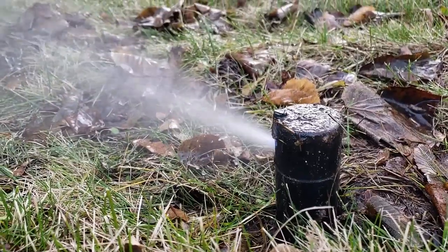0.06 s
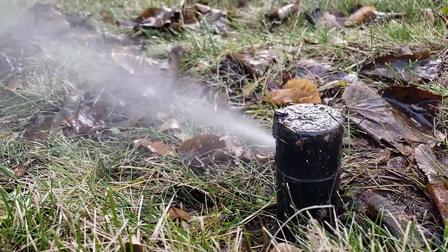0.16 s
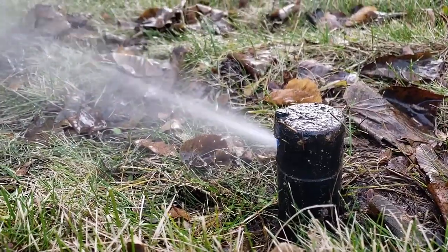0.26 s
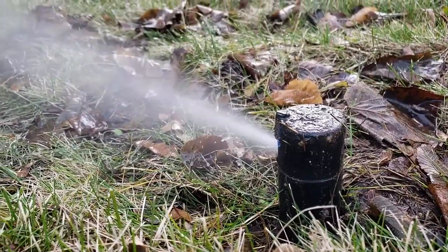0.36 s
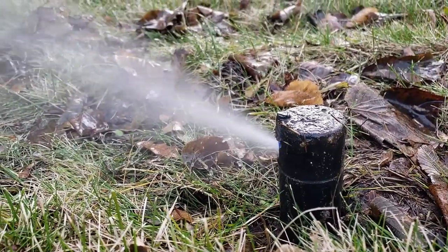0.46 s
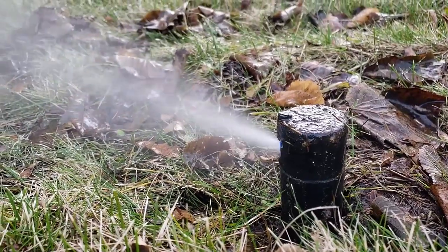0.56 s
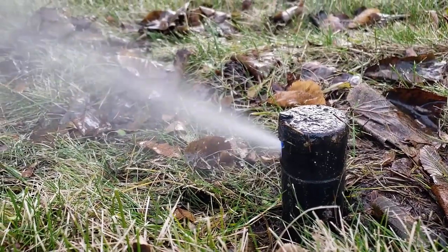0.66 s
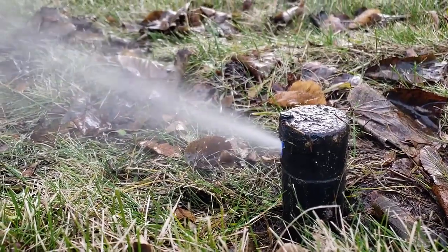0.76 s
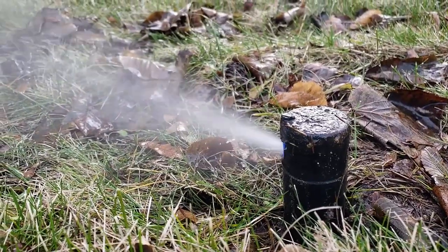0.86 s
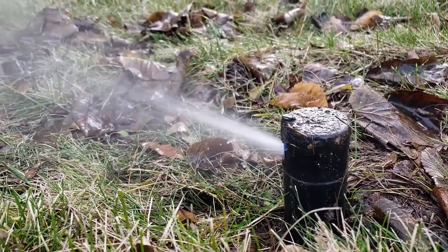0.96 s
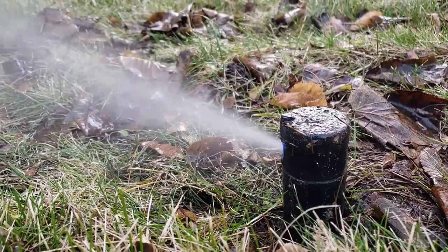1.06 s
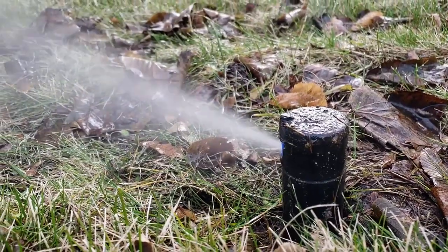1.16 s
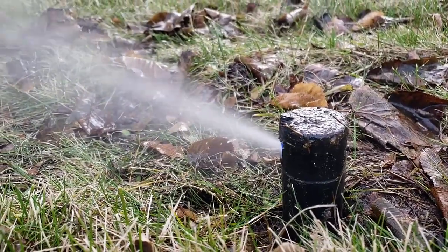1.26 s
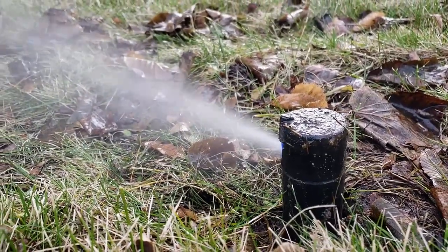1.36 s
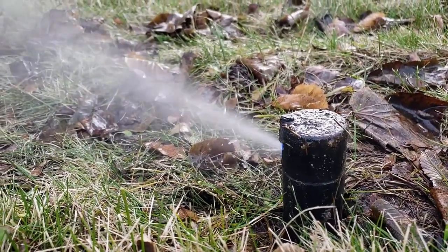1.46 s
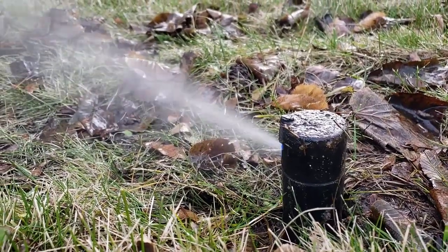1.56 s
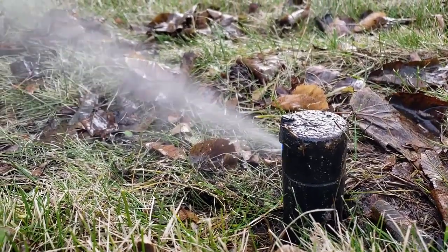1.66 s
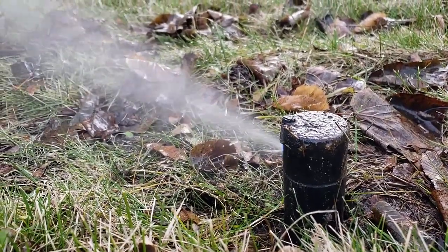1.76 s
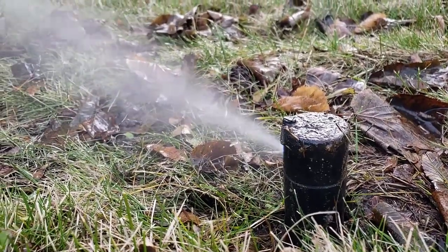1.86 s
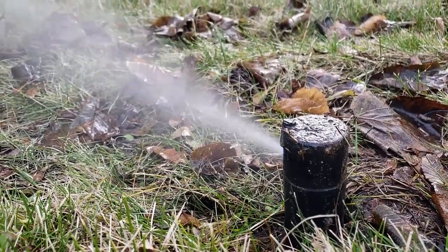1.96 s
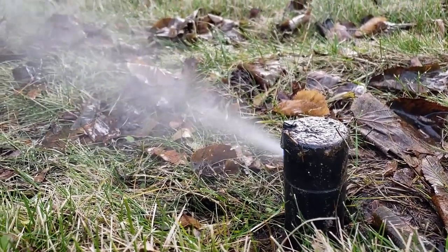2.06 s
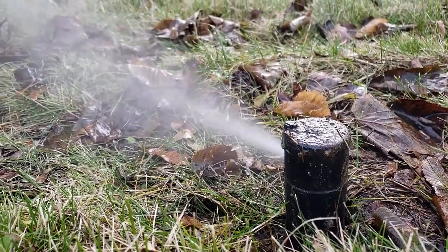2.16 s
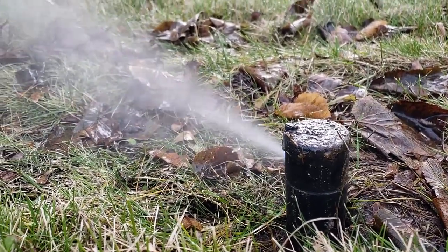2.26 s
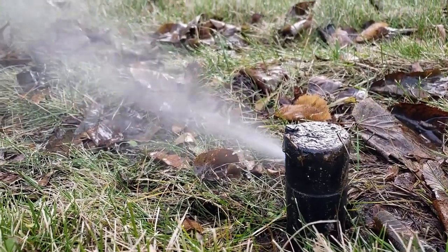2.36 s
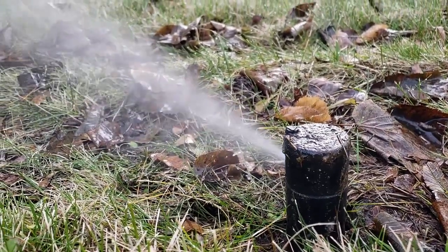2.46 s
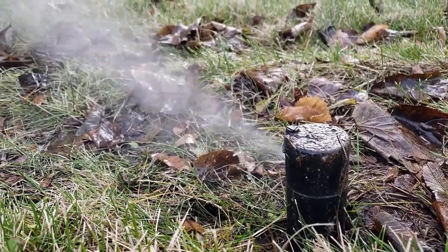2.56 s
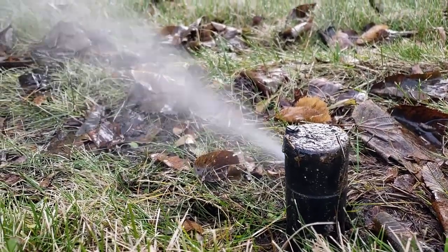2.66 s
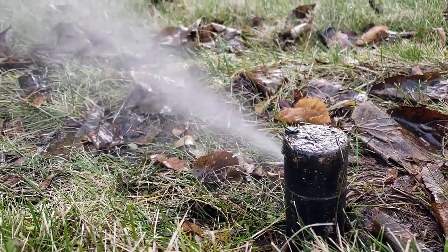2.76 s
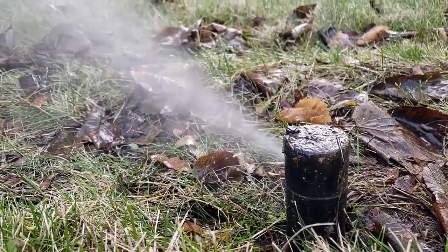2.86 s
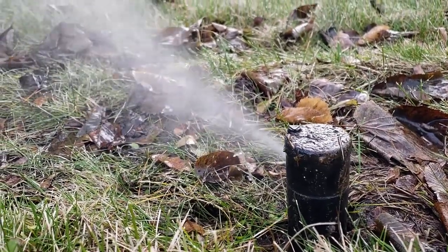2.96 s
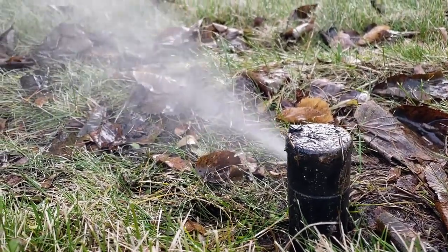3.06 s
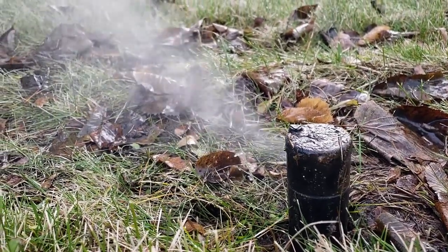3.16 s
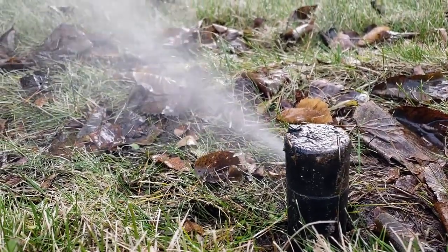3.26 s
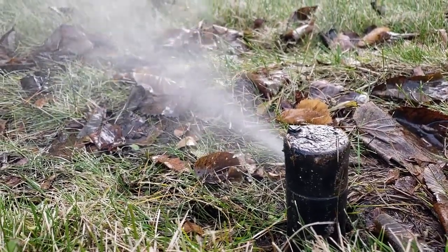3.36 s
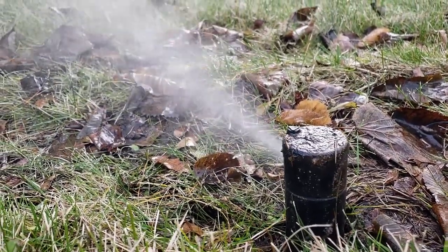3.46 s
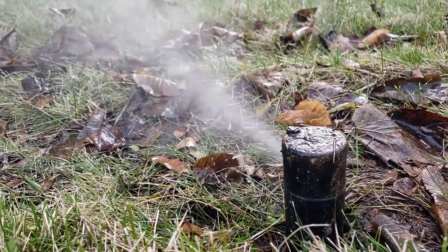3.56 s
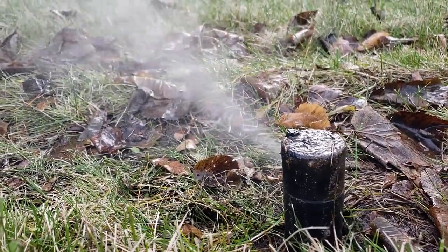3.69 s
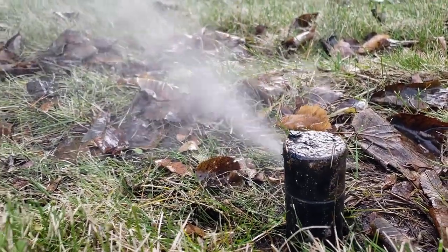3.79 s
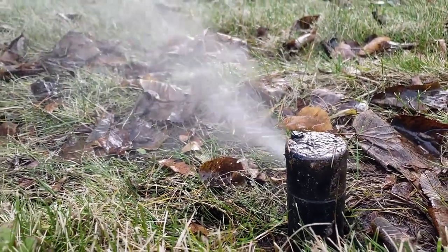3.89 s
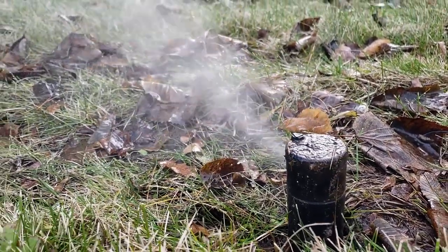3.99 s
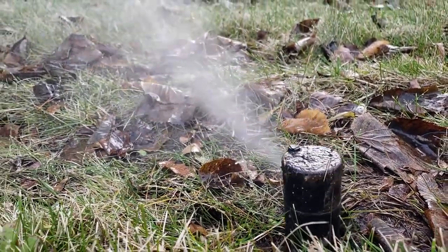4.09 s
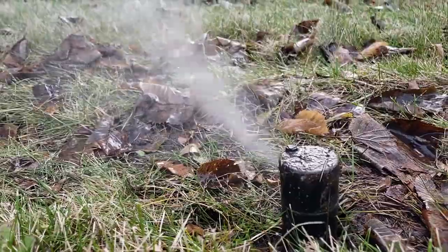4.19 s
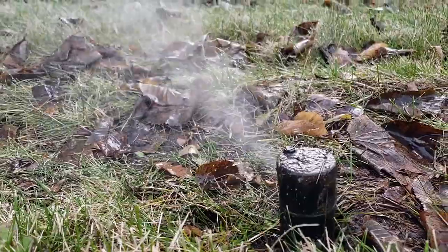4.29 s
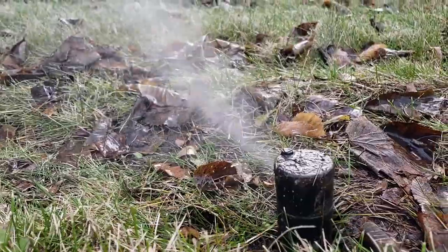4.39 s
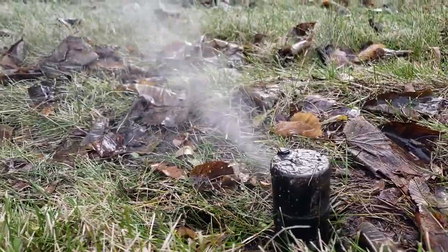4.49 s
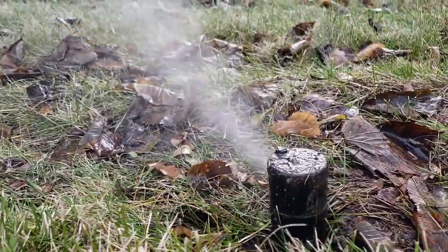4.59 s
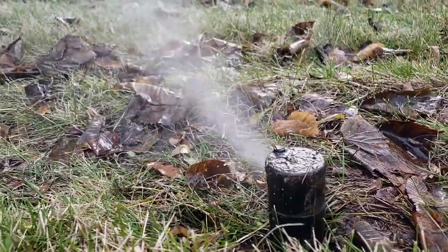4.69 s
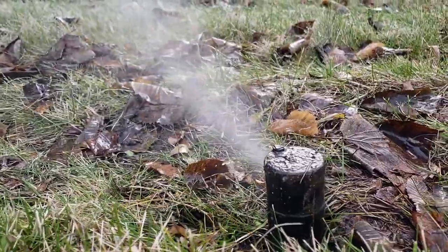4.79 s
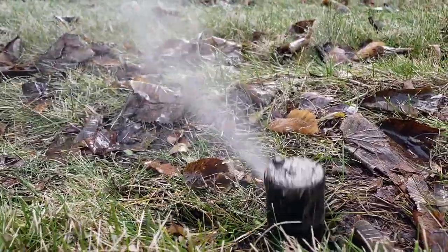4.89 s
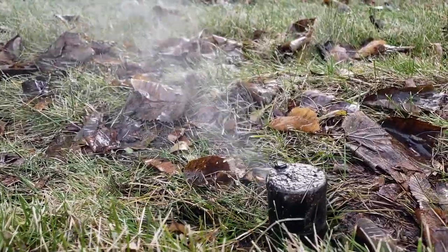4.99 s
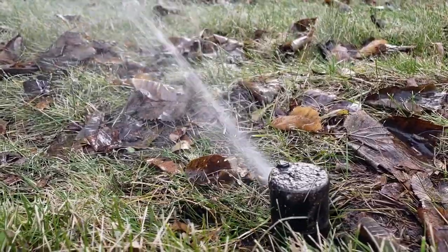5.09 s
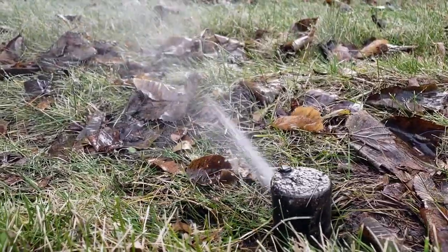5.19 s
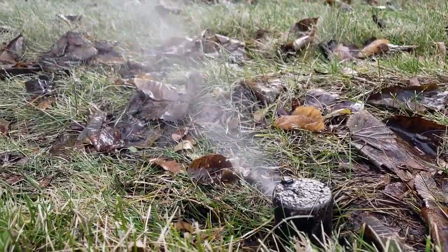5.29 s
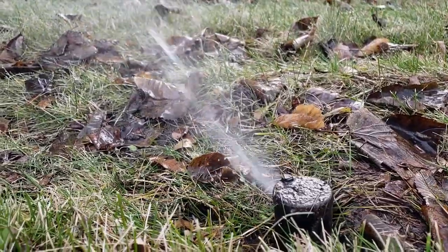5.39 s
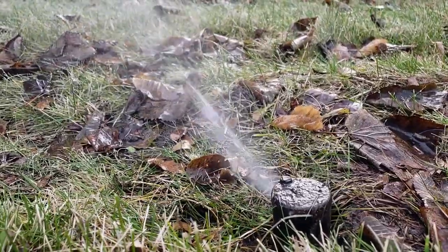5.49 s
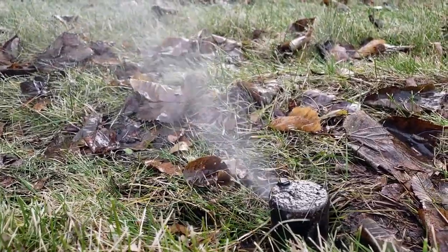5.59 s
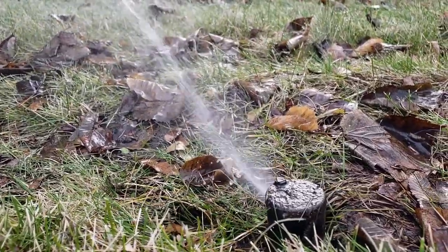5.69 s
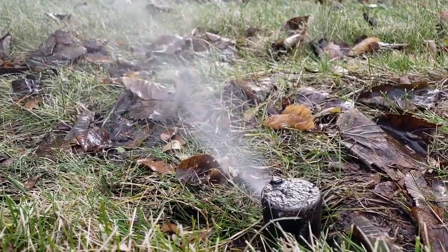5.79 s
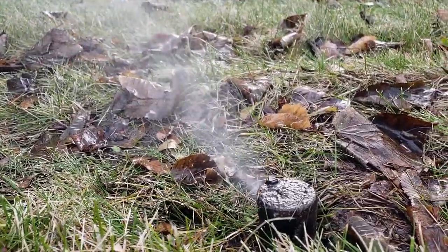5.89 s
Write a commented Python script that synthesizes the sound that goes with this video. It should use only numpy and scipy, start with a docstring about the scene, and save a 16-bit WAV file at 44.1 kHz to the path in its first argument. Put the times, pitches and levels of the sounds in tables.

```python
"""A pop-up lawn sprinkler hisses close to a two-port microphone: a turbulent jet of air and mist over the
resonances of its riser pipe. Far off a machine hums over a low outdoor rumble. From 1.45 s to 3 s the
head turns slowly away, and the rumble starts to swell. From 4.1 s the head sinks into the turf in three
steps, each giving the hiss a new colour, while slugs of water, rare at first, choke the nozzle often."""
import sys
import numpy as np
from scipy import signal
from scipy.fft import rfft, irfft, next_fast_len
from scipy.io import wavfile
from scipy.ndimage import uniform_filter1d, map_coordinates

SR = 44100
rng = np.random.default_rng(int(sys.argv[2]) if len(sys.argv) > 2 else 0)


def transcribe(u):
    """Save the signal u as a 16-bit wav file named by the first command-line argument.

    u: samples, shape (n,) or (channels, n), limited to [-1, 1]; the rate is SR.
    q: integer samples, one column per channel.
    """
    v = np.clip(np.atleast_2d(u).T, -1, 1)
    q = np.round(v * 32767).astype(np.int16)
    wavfile.write(sys.argv[1], SR, q)


N = 261954


def amp(db):
    """Amplitude ratio of a level in decibels."""
    return 10 ** (np.asarray(db) / 20)


def unit(x):
    """Normalisation to rms 1."""
    return x / np.sqrt(np.mean(np.abs(x) ** 2) + 1e-20)


def columns(rows, at):
    """Linear interpolation of each later column against the first."""
    axis, *values = np.transpose(rows)
    return np.array([np.interp(at, axis, column) for column in values])


def on_log_hz(rows, hz):
    """Interpolation of a spectrum's columns on a logarithmic frequency axis."""
    rows = np.array(rows, float)
    return columns(np.c_[np.log(rows[:, 0]), rows[:, 1:]], np.log(hz + 1))


def bump(t, centre_s, width_ms):
    """Gaussian pulse of height 1, its width taken at half height."""
    return np.exp(-4 * np.log(2) * ((t - centre_s) * 1000 / width_ms) ** 2)


def wobble(rate, t):
    """Random modulation of rms 1: a spline through `rate` knots a second."""
    knots = rng.standard_normal(int(N * rate / SR) + 4)
    return unit(map_coordinates(knots, [t * rate], mode="nearest"))


def patches(hz, t, bins, span):
    """Random field of rms 1, correlated over `bins` frequency bins and `span` frames."""
    field = uniform_filter1d(rng.standard_normal((len(hz), len(t))), size=bins, axis=0)
    return unit(uniform_filter1d(field, size=span, axis=1))


def coloured(x, gain):
    """Zero-phase filtering: the spectrum of x times a gain of frequency."""
    size = next_fast_len(N + 8192)
    return irfft(rfft(x, size) * gain(np.fft.rfftfreq(size, 1 / SR)), size)[..., :N]


def frames(x, size):
    """Short-time Fourier transform with three quarters of overlap."""
    return signal.stft(x, SR, nperseg=size, noverlap=size * 3 // 4)


def samples(spectra, size):
    """Overlap-add synthesis from short-time spectra."""
    return signal.istft(spectra, SR, nperseg=size, noverlap=size * 3 // 4)[1][..., :N]


def spray(frame=1024):
    """Turbulence and tearing droplets radiate broadband noise, partly coherent at two spaced ports."""
    # coherence of the side wave with the mid wave: (frequency [Hz], coherence [0-1])
    coherences = [(300, 0.94), (1500, 0.72), (4000, 0.92), (8000, 0.53), (15000, .7)]
    droplet_db = unit(uniform_filter1d(rng.standard_normal(N), size=12))
    turbulence = unit(amp(droplet_db) * rng.standard_normal((2, N)))
    hz, t, (mid, stray) = frames(turbulence, frame)
    mid_db, side_db, balance_db = hiss_colour(hz, t)
    side_gain = amp(side_db - mid_db)
    coherence = on_log_hz(coherences, hz)[0][:, None]
    # the side wave's in-phase part tilts the balance; its quadrature part makes the left port lead
    imbalance = np.tanh(balance_db * np.log(10) / 20)
    in_phase = np.clip(imbalance * (1 + side_gain ** 2) / (2 * side_gain), -coherence, coherence)
    quadrature = np.sqrt(coherence ** 2 - in_phase ** 2)
    side = side_gain * ((in_phase + 1j * quadrature) * mid + np.sqrt(1 - coherence ** 2) * stray)
    # slowly changing narrow ridges stand for echoes off turf and leaves
    ridges_db = 2.36 * np.clip(hz[:, None] / 2500, 0, 1) * patches(hz, t, bins=2, span=90)
    steady = samples(amp(mid_db + ridges_db) * np.array([mid + side, mid - side]), frame)
    hz, t, spectra = frames(steady, frame // 4)  # shorter frames resolve the brief chokes
    return samples(spectra * amp(nozzle_flow_db(hz, t)), frame // 4)


def hiss_colour(hz, t):
    """Spectral interpolation: mid, side and balance [dB] blend as the head turns and sinks."""
    # colour of the hiss at each head position, in three lists for riser pipe, jet and mist:
    # (frequency [Hz], mid level [dB], side level [dB], left minus right [dB])
    # in `turned` and `low` a narrow notch is filtered out of the mid wave near 8 kHz
    facing = ([(217, -34, -69, 16), (347, -12.5, -13.5, 18), (470, -9, -20.5, 8), (593, -8.5, -19, -1.5),
               (740, -24, -69, -1), (1450, -29.5, -43, -1), (1660, -38.5, -25, 2.5), (1920, -38, -49, -1),
               (2082, -29, -31, 4.1)], [(2167, -14, -16, 4), (2500, -6, -39, -4.5), (2990, 0.5, -15, 5),
               (3160, -5, -7.5, -1), (4040, 2, -26, 2.5), (4500, -10, -11, -3), (4920, 0, -0.5, 3),
               (5520, -1, -7, 15), (5720, 6, -9, 0.5), (6260, -0.5, -4, 3), (5980, -21, 5, 1),
               (6680, -4.5, -8, -2), (7060, -7.5, -16, -2)], [(7400, -7.5, -1, -3), (7460, -12, -11, -1),
               (8000, -12.5, -9, 2), (9900, -0.5, -3, -1.5), (10300, -9, 1, -2), (10600, -3, 6.5, -2.5),
               (11020, -6.5, 4, -2.5), (11770, 2.5, -1, -3), (12200, -4.5, -5, 0), (13100, -1.5, 0, 0),
               (13500, -1.5, -2, 2), (13950, 8, -3, -3), (14650, -7.5, 0, -3), (15600, -2.5, 1.5, -2)])
    turned = ([(223, -30, -56, 9), (334, -12, -14, 14), (595, -3, -23, -1), (693, -18, -23, -4),
               (780, -22, -44, 3), (990, -22, -48, -0.5), (1810, -29, -23, 4), (1950, -36, -37, 2.9),
               (2060, -19, -22, 7)], [(2224, -3.5, -10, 0.1), (2470, -3.5, -42, -0.5), (2890, 5, -9, 0.6),
               (3310, -4, -4, 3.0), (4050, 6.5, -28, -0.5), (4715, -5, -16, -3), (4630, -9.5, 5, 2.6),
               (5020, 1, -2, 6), (5390, -1.5, -3, 4), (6070, 6, -5.6, -1), (6210, -5.5, 3, -1.2),
               (7200, -6.5, -14.9, -1.8), (7010, -4, -9, -2.5)], [(7340, -4, 6, -3.5), (7440, -22, 1, 4),
               (7750, -55, -12.9, 1.8), (8300, -11.5, -13.2, 0.5), (8540, -6.5, 0, 1.5),
               (9640, 1.5, -4, -1.5), (10320, -5.5, 3.5, -5), (11230, -7, 3, 2), (12000, 0, -2, 0.3),
               (12050, -12, -5.0, -1.3), (12500, 1, -1, -3), (14000, -2, 1, -0.5), (14330, -12, 0, -1),
               (15340, 0, -6, -3)])
    partly_sunk = ([(223, -30.5, -40, 6), (326, -11.5, -15, 10), (550, -5, -24, 0), (640, -7, -18, -4),
                    (830, -25, -32, 0), (970, -18, -32, 1), (1240, -26, -33, 1), (1400, -16.5, -28, 4),
                    (1590, -26.5, -23, 4), (1730, -20.5, -27, 4), (1880, -32, -26, 4), (2070, -25, -24, 4)],
                    [(2220, -6, -12, -1), (2480, -5.5, -28, 1), (2920, 5, -14, -1), (3230, -3.5, -7, 2.6),
                    (3730, 0, -26, 0.1), (4020, 8.5, -2, -2), (4550, 8, 3, 1), (5060, -2.5, -11, 1.7),
                    (5210, -3, -2, -2.1), (5600, -14, -5.0, 2.6), (5800, -0.5, 0, 0), (6680, -4, -6.0, -4),
                    (6960, -0.5, -12.4, -2.7)], [(7260, -15, -3, -1.4), (8000, -7, -4.5, 4),
                    (9000, -6, -16.2, -0.4), (9690, -13.3, -9.0, -1.7), (10270, -3, 3.5, -5),
                    (11460, 1, 5.5, -2.5), (12000, -19, -16, -0.5), (12500, 1, -5.3, -0.0),
                    (12640, 0, 2, 1), (13500, -13, -10.4, -1.9), (13900, -1, -6, -1.3),
                    (14900, -7.1, 1, -4.1), (15160, -10.1, -0.5, -2.9), (15720, -3, -10.1, -2)])
    low = ([(224, -28.5, -34, 9), (358, -5, -14, 7), (607, -3, -19, -2), (850, -18, -22, -2),
            (1110, -5.5, -16, 4), (1230, -17, -15, 4), (1390, 2, -8, 5), (1580, -22, -16, 5),
            (1720, -11, -15, 8), (1930, -13.5, -13, 8), (2100, -26, -20, 2), (2220, -12, -22, 2)],
            [(2380, -20, -24.5, 0.8), (2660, -6, -26.5, 0.1), (3000, 1, -11.2, 0.7), (3140, -2.5, -3, 3.2),
            (3620, -4, -16.6, 0.3), (4100, 3.5, -9.0, -1.7), (4390, 4, 7, -2), (5080, 5, 2, 4),
            (5280, 5.5, 5, 3), (5940, -8, -2, 3.1), (6200, -5, 0, -0.5), (6650, -17, -9.8, -1.1),
            (6940, -0.5, -7, -1.9)], [(7300, -7, -3, -1.6), (7850, -40, -7, -2), (8800, -16, -22.3, -0.3),
            (8800, -10, -10, -0.2), (10340, -7, 8.5, -1), (10900, -1.5, 1.7, -0.6), (11840, -5, -6, -1.9),
            (13390, -5, 2, -3.1), (13650, -9.4, -4, -1.8), (13910, -10, -3.7, -1.3), (14470, 0, -7.1, -1.1),
            (14860, -8.4, 0, -1.6), (15300, 1, -1.5, -3.3), (15720, -3.9, -4.8, -5.8)])
    sunk = ([(223, -28.5, -33, 9), (360, -5.5, -14, 7), (560, -4, -19, -1), (880, -14.5, -19, -3),
             (1070, -0.5, -15, 4), (1210, -11, -10, 3), (1430, -1, -9, 5), (1620, -13.5, -9, 8),
             (1770, -3.5, -8, 8), (1950, -6, -9, 9), (2100, -22, -13, 6)], [(2170, -8.5, -10.5, 2.7),
             (2500, -13.0, -13, 2.0), (2800, -7, -26.4, 0.0), (3140, -3.5, -4, 1.5), (3420, -4, -5, 2.7),
             (3850, -15, -2, 0.5), (3620, -8, -9.4, 0.8), (4330, -11, -4, -0.1), (4860, 3.5, 5.5, 0.5),
             (5580, 2.9, 4.9, 3.5), (6500, -8, -4, 0), (6650, -3.5, -9.8, -4.0), (6980, -11, -8.0, -2.5)],
             [(7200, -6, -7, -2), (8260, -21, -3, 0.4), (8450, -17, -4.6, 0.3), (8960, -24, -5.9, -0.1),
             (9620, 2, -4.2, -1), (10100, -7, -8.5, -4.8), (10240, 0.5, -3.6, -5.0), (10800, 4, -4.9, -4.4),
             (11170, 4.5, -7.7, -1.7), (11120, -7, -2, -0.3), (12960, -6, -8.6, -0.5), (14430, 1, 5, -3.2),
             (15460, -1, -8.3, -2.3), (15720, -7.9, -9.1, -0.8)])
    # upward drift within each position: (time of rest pitch [s], jet rate [%/s], mist rate [%/s])
    glides = [(1.2, 0.1, .4), (2.1, 0.3, 2.3), (4.5, 3.6, .6), (5.15, 22, 3), (5.65, 1.8, 0.3)]
    # travel from one position to the next: (start [s], end [s])
    moves = [(1.45, 3.01), (4.1, 4.21), (4.94, 5.02), (5.28, 5.34)]
    positions = (facing, turned, partly_sunk, low, sunk)
    colour, *later = [glided(bands, hz, t, *glide) for bands, glide in zip(positions, glides)]
    for (start, end), target in zip(moves, later):
        share = np.clip((t - start) / (end - start), 0, 1)
        colour = (1 - share) * colour + share * target
    return colour


def glided(bands, hz, t, rest_s, jet_rate, mist_rate):
    """Frequency scaling: jet and mist bands glide as the nozzle moves; the pipe's resonances stay put."""
    pipe, jet, mist = bands
    hz = hz[:, None]
    in_jet = np.clip(hz / 1500 - 1.5, 0, 1)
    in_mist = np.clip((hz - 6600) / 800, 0, 1)
    percent_per_s = (1 - in_mist) * in_jet * jet_rate + in_mist * mist_rate
    stretch = 1 + np.clip(percent_per_s * (t - rest_s) / 100, -0.07, 0.07)
    bass_floor = [(120, -36, -62, 0)]
    return on_log_hz(bass_floor + pipe + jet + mist, hz / stretch)


def nozzle_flow_db(hz, t):
    """Amplitude modulation by the flow: it flutters, slugs choke it, pent-up air surges after each."""
    # strength of the flow: (time [s], hiss gain [dB], pipe gain relative to the hiss [dB])
    flow = [(0, -23.5, 0), (0.6, -23, -.5), (1.3, -22, -3), (1.5, -23, 0), (1.7, -24.5, -6),
            (2.0, -24, -1.5), (2.45, -24, 0), (2.7, -25.5, -4.5), (3.1, -25.5, 0.5), (3.7, -24, 0),
            (4.15, -24.5, -.5), (4.55, -26.5, 0), (4.8, -23.5, 3), (5.3, -26, 0), (5.94, -25, 1.5)]
    # water slugs in the nozzle: (time [s], dip before weighting by frequency [dB], width [ms])
    slugs = [(0.52, -5, 9.5), (2.668, -3, 18), (3.273, -2.5, 44), (3.314, -3, 25), (4.085, -2.5, 41),
             (4.226, -8, 23), (4.26, -5.5, 12), (4.319, -3.5, 16), (4.389, -6.5, 21), (4.459, -6, 11),
             (4.526, -7.5, 21), (4.729, -9, 34), (4.928, -7.0, 35), (5.092, -5, 65), (5.174, -5.5, 21),
             (5.288, -4, 12), (5.354, -1, 11), (5.46, -10.5, 8.7), (5.555, -6, 42), (5.626, -6.5, 14),
             (5.731, -8, 46)]
    surge_share, surge_delay_s, surge_ms = 0.12, 0.063, 36
    hiss_db, pipe_db = columns(flow, t)
    choke_db = sum(db * (bump(t, s, ms) - surge_share * bump(t, s + surge_delay_s, surge_ms))
                   for s, db, ms in slugs)
    roughness = np.interp(t, [0, 2.5, 5.9], [0.55, 1.1, 1.5])  # grows as the pressure falls
    flutter_db = roughness * (0.32 * wobble(14, t) + 0.55 * wobble(45, t) + 0.6 * wobble(120, t))
    unsteady_db = choke_db + flutter_db
    # the air column in the riser feels each slug more than the free jet does
    in_pipe = np.clip(np.log2(1500 / (hz[:, None] + 1)), 0, 1)
    gurgle_db = pipe_db + 0.67 * unsteady_db + 1.07 * wobble(25, t)
    # mist already in flight keeps fizzing, so the treble follows the nozzle less
    follow = np.interp(hz, [3000, 12000], [1.1, 0.8])[:, None]
    flicker_db = 1.07 * patches(hz, t, bins=6, span=14)
    return hiss_db + follow * unsteady_db + in_pipe * gurgle_db + flicker_db


def noise(gain):
    """Spectral shaping of white noise by a gain of frequency, at rms 1."""
    return unit(coloured(rng.standard_normal(N), gain))


def machine_hum():
    """Narrow-band noise is heard as unsteady tones: the hum of a far machine."""
    # Gaussian spectral lines: (frequency [Hz], standard deviation [Hz], level against the rumble [dB])
    lines = [(64, 9, -5.5), (175, 5.5, -9)]
    return sum(amp(db) * noise(lambda hz: np.exp(-0.5 * ((hz - centre) / width) ** 2))
               for centre, width, db in lines)


def yard():
    """Long waves reach both ports nearly alike: rumble and hum hold, then swell, bulging once."""
    # spectrum of the outdoor rumble: (frequency [Hz], relative spectral level [dB])
    spectrum = [(12, -42), (20, -16), (64, -1.5), (177, -5.5), (203, -13), (260, -13), (340, -32),
                (570, -120)]
    start_db, swell_from_s, swell_db_per_s, bulge_db = -77.5, 2.35, 3, 4
    rumble_gain = lambda hz: amp(on_log_hz(spectrum, hz)[0])
    mid = machine_hum() + noise(rumble_gain)
    side = amp(-11) * noise(lambda hz: rumble_gain(hz) / (1 + (hz / 80) ** 2))
    t = np.arange(N) / SR
    swell_db = swell_db_per_s * np.maximum(t - swell_from_s, 0)
    gain_db = start_db + swell_db + bulge_db * bump(t, centre_s=3.94, width_ms=90)
    lean_right = amp([[-1.5], [1.5]])
    return amp(gain_db) * lean_right * np.array([mid + side, mid - side])


def scene():
    """Superposition of the sprinkler and the yard."""
    return spray() + yard()


def record(dry, limit_hz=16252):
    """Band limiting: a steep low-pass filter that passes nothing above its limit."""
    # low-pass response: (frequency [Hz], gain [dB])
    roll_off = [(15745, 0), (15820, -38), (16250, -62)]
    return coloured(dry, lambda hz: amp(on_log_hz(roll_off, hz)[0]) * (hz < limit_hz))


dry = scene()
out = record(dry)
transcribe(out)
```